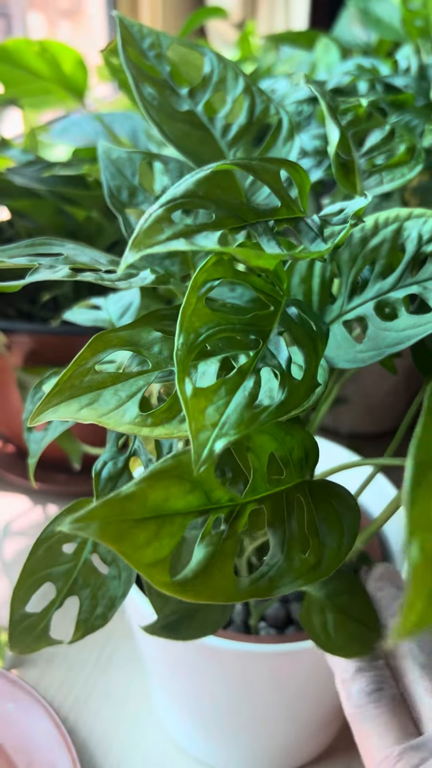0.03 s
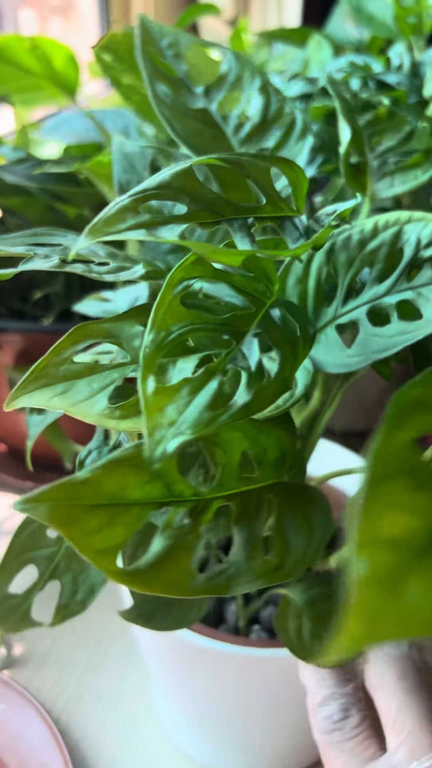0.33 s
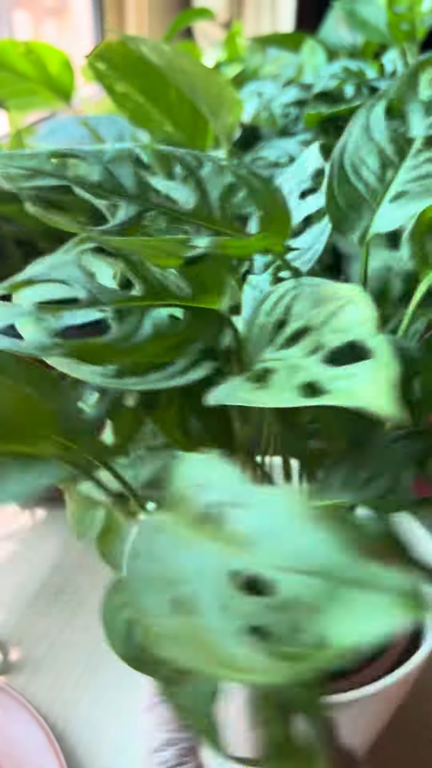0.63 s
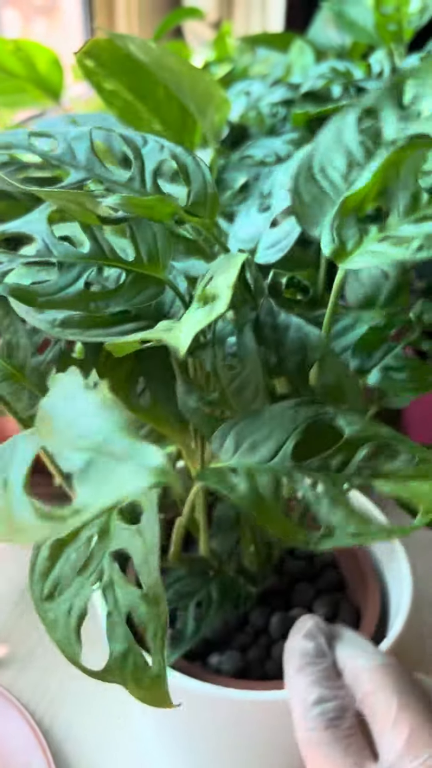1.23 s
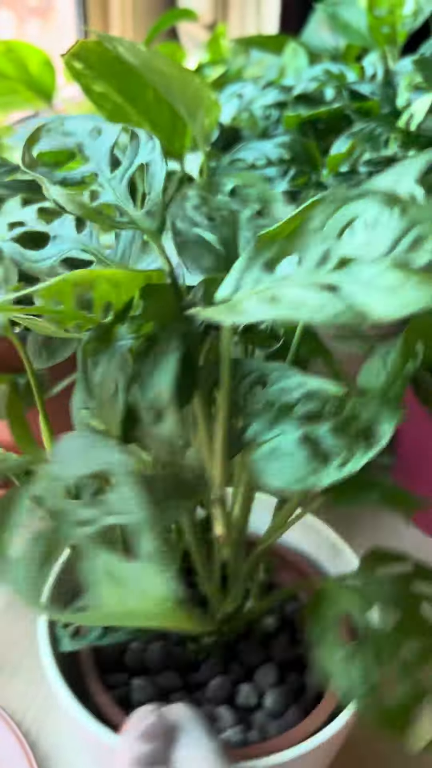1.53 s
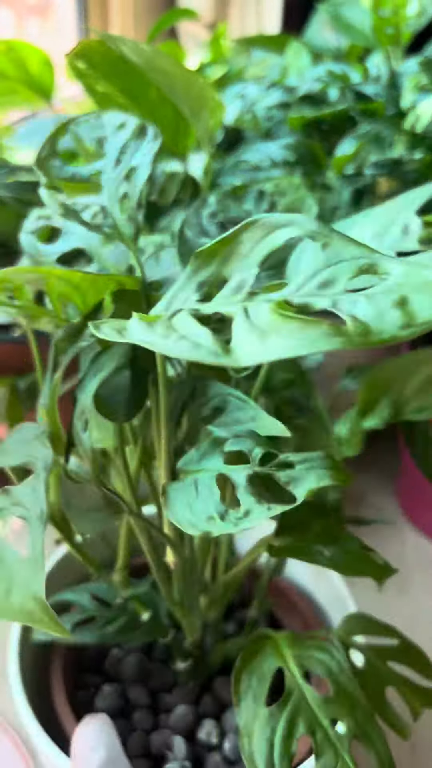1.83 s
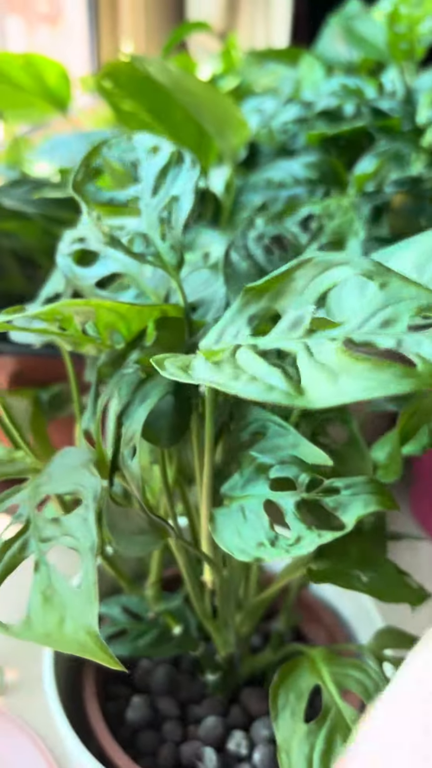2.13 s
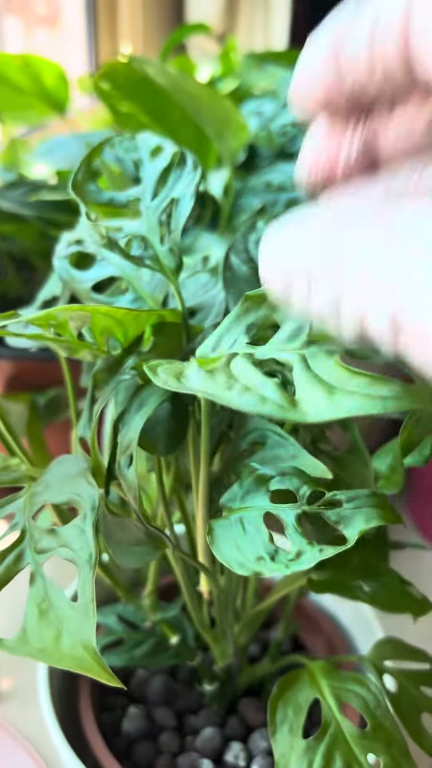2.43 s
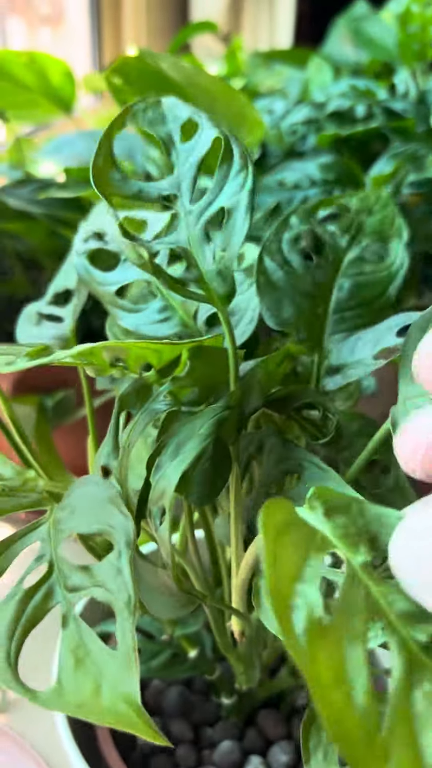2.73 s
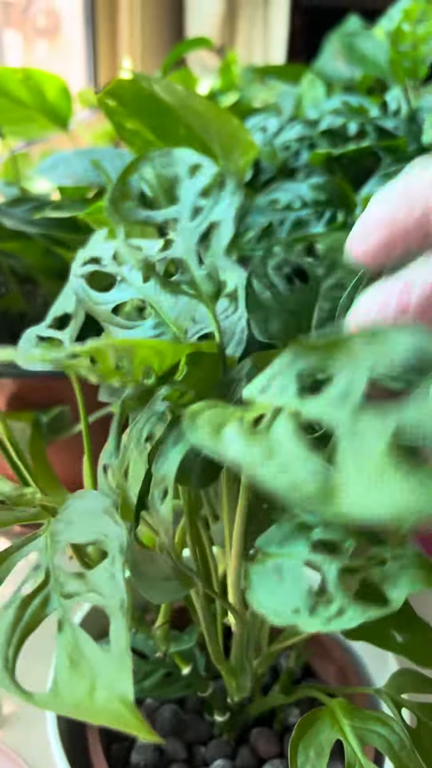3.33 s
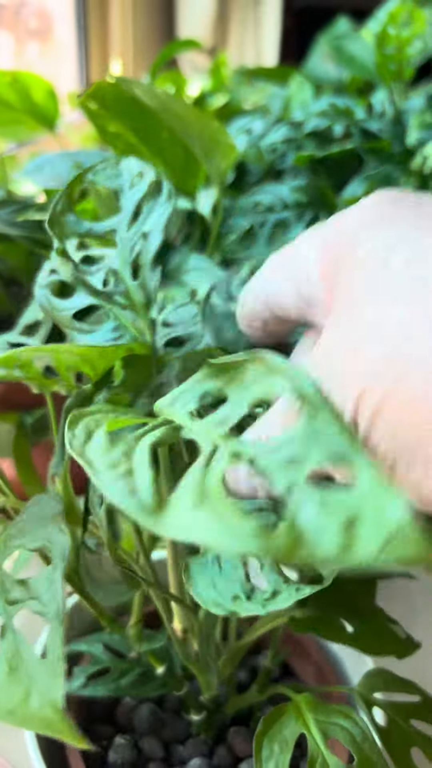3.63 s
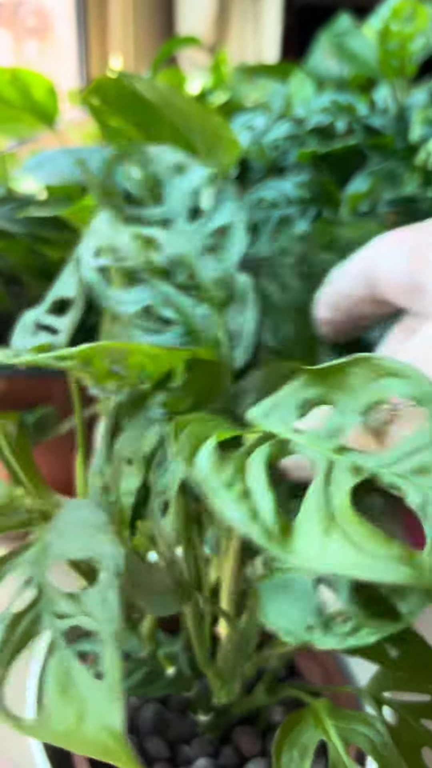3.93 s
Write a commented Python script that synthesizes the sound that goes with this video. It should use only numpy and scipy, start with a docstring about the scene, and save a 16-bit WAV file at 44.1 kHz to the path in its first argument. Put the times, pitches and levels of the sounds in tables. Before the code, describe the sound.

A plant pot scrapes twice on a tabletop, then leaves rustle softly under a hand.

```python
"""A gritty, hollow scrape, twice: a plant pot is turned on a tabletop, its foot catching and slipping
in tiny steps that ring pot and table. A hand brushes through the leaves, which swish and tick,
faintly at first and louder once the pot is still. Ventilation rumble and hum fill the small room."""
import sys
import numpy as np
from scipy import signal
from scipy.fft import rfft, irfft
from scipy.io import wavfile
from scipy.ndimage import uniform_filter1d

SR = 44100
rng = np.random.default_rng(int(sys.argv[2]) if len(sys.argv) > 2 else 0)


def to_wav(sig):
    """Store sig (one row per channel, or 1-D mono) as 16-bit WAV at the path in sys.argv[1].

    Samples outside -1..1 are clipped; the rate is SR.
    """
    pcm = np.clip(np.atleast_2d(sig), -1, 1) * 32767
    pcm = np.round(pcm).astype(np.int16)
    wavfile.write(sys.argv[1], SR, pcm.T)  # frames by channels


N = 176400

# Scrape envelopes, one list per turn: time_s, low_judder_db, mid_rasp_db, high_grit_db
TURNS = [
    [(.2, -59, -78, -77), (.24, -50.5, -64, -70), (.26, -43.5, -56.5, -66), (.325, -44, -54, -60),
     (.37, -38.5, -47.5, -56), (.43, -37, -43.5, -48), (.47, -38, -47.5, -48.5), (.53, -40, -40.5, -44.5),
     (.595, -40.5, -49.5, -53.5), (.646, -38, -42, -49.5), (.708, -38, -46.5, -53.5), (.722, -52, -66, -63),
     (.78, -67, -68, -68)],
    [(1.17, -55, -72, -73), (1.21, -51, -59, -64.5), (1.236, -42, -51, -63.5), (1.282, -52, -59, -65.5),
     (1.345, -45.5, -51.5, -60.5), (1.41, -43, -42.5, -51.5), (1.456, -40, -40.5, -48.5),
     (1.52, -41.5, -42, -47.5), (1.57, -40, -43, -49), (1.61, -44, -45, -54.5),
     (1.658, -39.5, -52.5, -61.5), (1.69, -58, -59, -69), (1.72, -72, -67, -78)],
]
# Leaf tone, airy hiss and papery body: freq_hz, gain_db
LEAF_HISS_EQ = [(1500, -24), (4000, -16), (6500, -2.5), (8200, 5.5), (12000, 7), (15500, 2)]
LEAF_BODY_EQ = [(400, -15), (1000, 4), (1800, 5), (2300, 3), (3000, 4.5), (4500, 2.5), (6500, 5),
                (9000, -3), (15000, -42)]
LEAF_GRAINS_PER_S, LEAF_SPREAD_DB = 4500, 2.2


def pot_scrape():
    """Slips of the foot ring table and pot; fine grit hisses and rings the wall."""
    # Deep pot-and-table modes, hollow pot modes and high wall modes:
    # pitch_hz, width_hz, first_turn_db, second_turn_db, left_minus_right_db
    body_modes = [(396, 29, -7.5, -9, -2.5), (501, 53, -7, -9, 0), (558, 46, -3, -3.5, -1),
                  (626, 47, -4, -2.5, 5), (686, 43.5, 2.5, 2, 6), (740, 44, -5, -3, 6),
                  (850, 78, -13, -12, 12.5)]
    hollow_modes = [(1000, 42, -10, -1, -8), (1062, 32, 7.5, 2, 5.5), (1152, 30, -3, 1.5, 3),
                    (1210, 26, 5.5, -2, 5.5), (1310, 26, 4.5, 9, -3), (1429, 26, 0, 9.5, -1),
                    (1618, 28, 1, 0, -6), (1705, 38, -0.5, -1.5, -7), (1825, 55, 1.5, -9, 3)]
    wall_modes = [(2013, 56, 3.5, 4.5, -6), (2343, 33, 6.5, 8, -6), (2472, 52, -1, 3.5, 7),
                  (2662, 28, 7, 6, 1), (2756, 45, 3, -3, 6), (2910, 50, -1, 3.5, 9),
                  (3140, 64, 1.5, 2, 3.5), (3290, 37, -2, 0, 4), (3500, 46, 4.5, 5, 5.5),
                  (3760, 35, 1, 1, 5), (3865, 62, 1, -4, 8), (4070, 40, 0, -6.5, 10),
                  (4480, 50, -7, -2.5, 14), (4730, 54, -5, -11, 4), (4920, 70, -1.5, -7, 10),
                  (5580, 30, -2, -10, 10), (5780, 33, 1.5, 0, 14), (6060, 56, -5, -7.5, 15),
                  (6680, 35, -5, -7, 3), (7300, 40, 0, -12, 6), (8100, 63, -6.5, -16, -2),
                  (8530, 53, -6, -1, 4)]
    # Broad tone of the low, middle and high friction: freq_hz, gain_db
    judder_eq = [(100, -18), (200, -5.5), (310, -4), (450, -7.5), (650, 8), (800, 0), (1100, -18),
                 (2500, -40.5)]
    rasp_eq = [(500, -29), (900, 6.5), (1150, -2.5), (1500, 2.5), (1800, -13), (2200, -15), (4000, -38)]
    grit_eq = [(900, -11), (1800, 6), (2400, 4.5), (3500, 0.5), (5000, -3), (6800, -1.5), (8600, -8),
               (12000, -4), (15500, -9)]
    t = np.arange(N) / SR
    envelopes = np.zeros((3, N))
    for rows in TURNS:
        time_s, *curves = np.array(rows).T
        gate = np.clip(np.minimum(t - time_s[0], time_s[-1] - t) / 0.02 + 1, 0, 1)
        envelopes += gate * undb([np.interp(t, time_s, db) for db in curves])
    judder_env, rasp_env, grit_env = envelopes
    second_turn = t > (TURNS[0][-1][0] + TURNS[1][0][0]) / 2
    chatter = undb(0.8 * wander(69.8))
    slips = lambda: chatter * close_stereo(grains(per_s=1000, spread_db=1.2), shared=0.7, above_hz=100)
    sand = lambda: chatter * close_stereo(grains(per_s=1800, spread_db=0.9), shared=0.96, above_hz=100)
    low = undb(.8) * resonate(slips(), body_modes, second_turn)
    low += undb(-8) * colour(slips(), judder_eq)
    middle = undb(.5) * resonate(slips(), hollow_modes, second_turn)
    middle += undb(-8) * colour(slips(), rasp_eq)
    high = undb(-1.5) * resonate(sand(), wall_modes, second_turn)
    high += undb(-4.5) * pan(0.5) * shell_ring(colour(sand(), grit_eq))
    return judder_env * even_pressure(low) + rasp_env * even_pressure(middle) + grit_env * high


def resonate(drive, modes, second_turn):
    """Friction drives damped resonances whose shares wander with the contact point; rms 1."""
    out = 0
    for k, (pitch_hz, width_hz, first_db, second_db, side_db) in enumerate(modes):
        gain = undb(np.where(second_turn, second_db, first_db) + 2.1 * wander(16.3))
        ring = signal.lfilter(*signal.iirpeak(pitch_hz, pitch_hz / width_hz, SR), drive)
        out = out + (-1) ** k * pan(side_db) * gain * ring
    return unit(out)


def shell_ring(x, t60_s=.035, sets_per_s=5):
    """The wall's countless weak modes ring, one set crossfading into the next as the pot turns."""
    t = np.arange(int(t60_s * SR)) / SR
    position = np.arange(N) / SR * sets_per_s
    out = np.zeros((2, N))
    for k in range(int(TURNS[-1][-1][0] * sets_per_s) + 2):
        response = rng.standard_normal(len(t)) * undb(-60 * t / t60_s)
        response /= np.linalg.norm(response)
        crossfade = np.cos(np.pi / 2 * np.clip(position - k, -1, 1))
        out += signal.oaconvolve(x * crossfade, response[None], axes=1)[:, :N]
    return out


def even_pressure(x, window_s=.025):
    """The hand presses evenly, so the strength holds from one moment to the next; rms 1."""
    power = np.mean(x ** 2, axis=0)
    for _ in range(2):
        power = uniform_filter1d(power, int(window_s * SR))
    return x / np.sqrt(power + 1e-12)


def table_nudges():
    """The tabletop rumbles briefly under the push."""
    # Dull bumps: peak_s, width_s, level_db
    nudges = [(0.256, 0.017, -51), (.69, 0.024, -51), (1.248, 0.029, -47.5), (1.382, 0.023, -42.5)]
    # Tabletop tone: freq_hz, gain_db
    table_eq = [(70, -28), (130, 0), (185, 4), (250, -2), (320, -11), (420, -4), (800, -47)]
    return sum(swell(*nudge) for nudge in nudges) * colour(rng.standard_normal(N), table_eq)


def foot_squeaks(pitch_hz=5790):
    """For an instant the foot sticks and slips in step with one high ring of the wall."""
    # Faint squeaks: peak_s, width_s, level_db
    squeaks = [(0.567, 0.01, -57), (0.627, 0.028, -57), (1.331, .011, -64.5), (1.5, 0.056, -64)]
    t = np.arange(N) / SR
    tone = np.sin(2 * np.pi * pitch_hz * t + 0.4 * wander(150))
    return sum(swell(*squeak) for squeak in squeaks) * pan(13) * tone


def leaf_rustle(trim_db=-5):
    """Leaves slide over skin and each other: swells of fine hiss and crinkles with a papery body."""
    # Faint stir under the hand, before the trim: time_s, level_db
    stir = [(0, -78), (.8, -70), (1.9, -74), (2.7, -75), (3.0, -79), (3.6, -66), (3.78, -67), (4, -65)]
    # Swishes, before the trim: peak_s, rise_s, fall_s, level_db, body_over_hiss_db
    swishes = [(0.9, 0.032, 0.073, -62, -2), (1.02, 0.078, 0.04, -63.5, -3), (1.8, 0.029, 0.026, -63, 0),
               (1.965, 0.044, 0.024, -64.5, 0.5), (2.08, 0.027, 0.031, -51.5, -7.5),
               (2.275, 0.046, 0.041, -57, -4), (2.445, 0.038, 0.021, -53, -5),
               (2.54, 0.032, 0.057, -61.5, -1), (2.815, .05, 0.091, -51.5, -2),
               (2.955, 0.025, 0.08, -49.5, -8), (3.11, 0.023, 0.012, -56, 1),
               (3.205, 0.045, 0.028, -49.5, -6.5), (3.345, 0.052, 0.034, -55.5, -4),
               (3.48, 0.046, 0.037, -58.5, -0.5), (3.545, 0.03, 0.02, -52, -4.5),
               (3.605, 0.035, 0.048, -55, 1), (3.86, 0.019, 0.017, -53.5, -0.5),
               (3.93, 0.032, 0.028, -58, 0.5)]
    t = np.arange(N) / SR
    hiss_power = undb(np.interp(t, *np.array(stir).T)) ** 2
    body_power = np.zeros(N)
    for peak_s, rise_s, fall_s, level_db, body_db in swishes:
        envelope = swell(peak_s, np.where(t < peak_s, rise_s, fall_s), level_db)
        hiss_power += envelope ** 2
        body_power += (envelope * undb(body_db)) ** 2
    flutter = undb(1.5 * wander(60))
    rub = lambda eq: colour(flutter * grains(LEAF_GRAINS_PER_S, LEAF_SPREAD_DB), eq)
    hiss = close_stereo(rub(LEAF_HISS_EQ) + undb(-7.5) * np.array([crinkles(), crinkles()]))
    body = rub(LEAF_BODY_EQ) * pan(4)
    return undb(trim_db) * (np.sqrt(hiss_power) * hiss + np.sqrt(body_power) * body)


def crinkles(per_s=490, low_hz=6850, high_hz=15170, decay_s=0.0018, spread_db=3.5):
    """Tiny buckles of a leaf, each a very short ring at its own pitch; rms 1."""
    out, t = np.zeros(N), np.arange(SR // 50) / SR
    for when, place, chance in rng.random((int(per_s * N / SR), 3)):
        pitch_hz = low_hz + place * (high_hz - low_hz)
        size = undb(-spread_db * np.log(max(chance, .01)))
        i = int(when * (N - len(t)))
        out[i:i + len(t)] += size * np.exp(-t / decay_s) * np.sin(2 * np.pi * pitch_hz * t)
    return unit(out)


def leaf_drag():
    """One leaf drags along the back of the hand with a fuller, hollow swish."""
    # Tone of leaf on skin: freq_hz, gain_db
    drag_eq = [(900, -14), (1850, 0), (2500, 0), (3300, 3.5), (4200, 1), (5500, -9), (8500, -14),
               (11300, 5), (12800, 3), (15000, -10)]
    rub = colour(grains(LEAF_GRAINS_PER_S, LEAF_SPREAD_DB), drag_eq)
    return swell(peak_s=2.83, width_s=0.044, level_db=-53) * close_stereo(rub)


def leaf_ticks(decay_s=.0035):
    """A leaf edge snaps free with a short bright tick."""
    # Snaps: start_s, level_db, body_over_hiss_db
    ticks = [(1.064, -68, -13), (1.1, -62, -9), (1.188, -48, -8), (1.228, -56, -9), (1.966, -53, -7),
             (2.4, -57, -11), (2.724, -61.5, 2), (2.946, -47, -18), (2.987, -47, -23), (3.017, -52, -15),
             (3.043, -52, -14), (3.06, -52, -6), (3.204, -48, -16), (3.337, -49, -14), (3.64, -63, -13),
             (3.668, -50, -12)]
    hiss = close_stereo(colour(rng.standard_normal((2, N)), LEAF_HISS_EQ))
    body = close_stereo(colour(rng.standard_normal((2, N)), LEAF_BODY_EQ))
    fade = np.exp(-np.arange(SR // 20) / SR / decay_s)
    out = np.zeros((2, N))
    for start_s, level_db, body_db in ticks:
        span = slice(int(start_s * SR), int(start_s * SR) + len(fade))
        out[:, span] += undb(level_db) * fade * (hiss[:, span] + undb(body_db) * body[:, span])
    return out


def stem_knocks(decay_s=.003):
    """Stiff stems click together and ring for a few milliseconds."""
    # Pitched clicks: start_s, pitch_hz, level_db
    knocks = [(1.19, 4800, -54), (3.06, 2850, -47), (3.361, 8300, -50)]
    out, t = np.zeros(N), np.arange(SR // 30) / SR
    for start_s, pitch_hz, level_db in knocks:
        i = int(start_s * SR)
        out[i:i + len(t)] += undb(level_db) * np.exp(-t / decay_s) * np.sin(2 * np.pi * pitch_hz * t)
    return out


def close_stereo(x, shared=1, above_hz=7960):
    """Both microphone ports hear a share of a close sound, out of step; less of it below above_hz."""
    # Phase lead of the left side: freq_hz, lead_rad
    port_phase = [(0, -1), (430, 0.4), (700, 1.64), (1100, 4.5), (1400, 5.5), (1890, 5), (3600, 8),
                  (5500, 5), (8000, 6), (9300, 3.5), (10700, 2.5), (11800, 0.5), (15500, 1.2)]
    freq_hz = np.fft.rfftfreq(N, 1 / SR)
    lead = np.exp(.5j * np.interp(freq_hz, *np.array(port_phase).T))
    share = shared * np.clip(freq_hz / above_hz, 0, 1) ** 2
    mid, side = rfft(x) * np.sqrt([(1 + share) / 2, (1 - share) / 2])
    return irfft(np.array([(mid + side) * lead, (mid - side) / lead]), N)


def near_echo(x, delay_s=.0017, echo_db=-10):
    """One early reflection off a nearby surface combs the rustle."""
    reflection = undb(echo_db) * np.roll(x, int(delay_s * SR), axis=1)
    return (x + reflection) / np.hypot(1, undb(echo_db))


def room(x, t60_s=0.53, damping_hz=4020):
    """A small furnished room adds a short, dark, diffuse tail."""
    t = np.arange(SR // 2) / SR
    tail = rng.standard_normal((2, len(t))) * undb(-60 * t / t60_s) * (t > .004)
    tail /= np.linalg.norm(tail, axis=1, keepdims=True)
    tail = signal.lfilter(*signal.butter(1, damping_hz, fs=SR), tail)
    return x + undb(-10) * signal.fftconvolve(x, tail, axes=1)[:, :N]


def ventilation():
    """The ventilation lays down a steady low rumble with a few wavering hum lines."""
    # Rumble tone, centre and sides: freq_hz, gain_db
    mid_eq = [(20, -27), (33, -27), (52, 0.5), (66, -7.5), (85, -1.5), (125, 1), (155, -6), (205, -4),
              (290, -14.5), (420, -12), (700, -19.5), (1000, -23.5), (1600, -27), (2500, -35.5),
              (5000, -46), (8000, -50), (15000, -96)]
    side_eq = [(25, -39), (60, -1), (130, -5), (220, 0), (400, -2.5), (700, 2), (1100, -9), (2000, -15),
               (5000, -33), (8000, -33), (15000, -43)]
    # Hum lines: pitch_hz, level_db, phase_wander_rad, drift_db_per_s
    hum_lines = [(58.4, -62, 1.6, 0), (120, -54, 0.85, 0), (204.6, -57.5, 0.77, -0.5),
                 (635.7, -58, 0.58, -2)]
    t = np.arange(N) / SR
    mid = undb(-48) * colour(rng.standard_normal(N), mid_eq)
    side = undb(-55.5) * colour(rng.standard_normal(N), side_eq)
    hum = np.zeros(N)
    for pitch_hz, level_db, wander_rad, drift_db_per_s in hum_lines:
        waver = undb(2.0 * wander(8.3))
        tone = np.sin(2 * np.pi * pitch_hz * t + wander_rad * wander(8))
        hum += undb(level_db + drift_db_per_s * t) * unit(waver * tone)
    return mid + hum + side * np.array([[1], [-1]])


def grains(per_s, spread_db):
    """Friction as random tiny impulses, a few much larger, with their own sign on each side; rms 1."""
    when, chance, left, right = rng.random((int(per_s * N / SR), 4)).T
    size = undb(-spread_db * np.log(np.maximum(chance, .01)))
    onsets = (when * N).astype(int)
    return unit(np.array([np.bincount(onsets, size * np.sign(side - .5), N) for side in (left, right)]))


def swell(peak_s, width_s, level_db):
    """Bell-shaped envelope; width_s is its standard deviation."""
    t = np.arange(N) / SR
    return undb(level_db) * np.exp(-.5 * ((t - peak_s) / width_s) ** 2)


def colour(x, eq):
    """Equalise through (freq_hz, gain_db) points; rms 1."""
    freq_hz, gain_db = np.array(eq).T
    bins_hz = np.maximum(np.fft.rfftfreq(N, 1 / SR), 1)
    gain = undb(np.interp(np.log(bins_hz), np.log(freq_hz), gain_db))
    return unit(irfft(rfft(x) * gain, N))


def wander(rate_hz):
    """Smooth random modulation; rms 1."""
    hold = int(SR / rate_hz)
    steps = np.repeat(rng.standard_normal(N // hold + 1), hold)
    return unit(uniform_filter1d(uniform_filter1d(steps, hold), hold)[:N])


def pan(db):
    """Stereo gains with the left side db louder than the right."""
    return undb(np.array([[db], [-db]]) / 2)


def undb(db):
    """Decibels to gain."""
    return 10 ** (np.asarray(db) / 20)


def unit(x):
    """Scale to rms 1."""
    return x / np.sqrt(np.mean(x ** 2))


def scene():
    """Pot and leaves in the room, over the ventilation."""
    pot = pot_scrape() + table_nudges() + foot_squeaks()
    plant = near_echo(leaf_rustle() + leaf_drag()) + leaf_ticks() + stem_knocks()
    return room(pot + plant) + ventilation()


def record(dry):
    """A steep low-pass cuts the very top."""
    cutoff_hz = 15700
    return signal.sosfilt(signal.ellip(10, .2, 80, cutoff_hz, fs=SR, output="sos"), dry)


dry = scene()
out = record(dry)
to_wav(out)
```